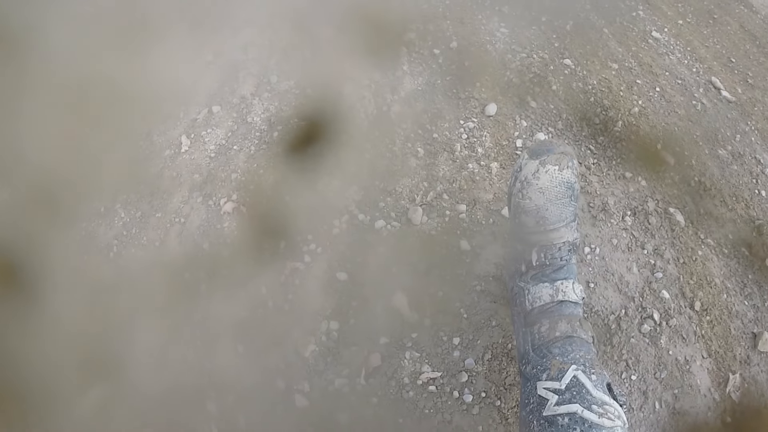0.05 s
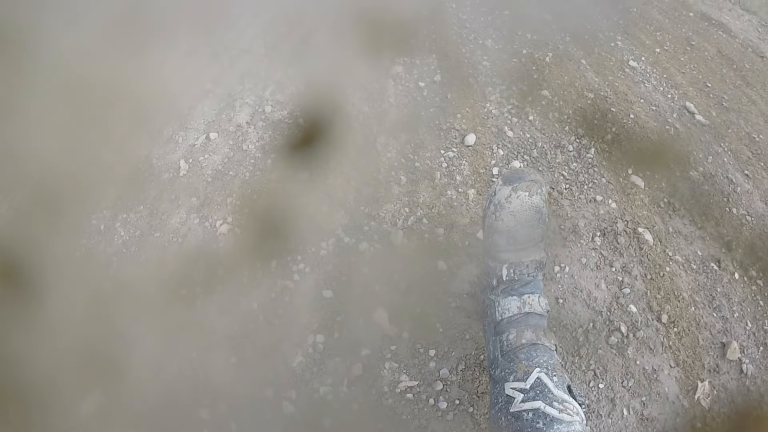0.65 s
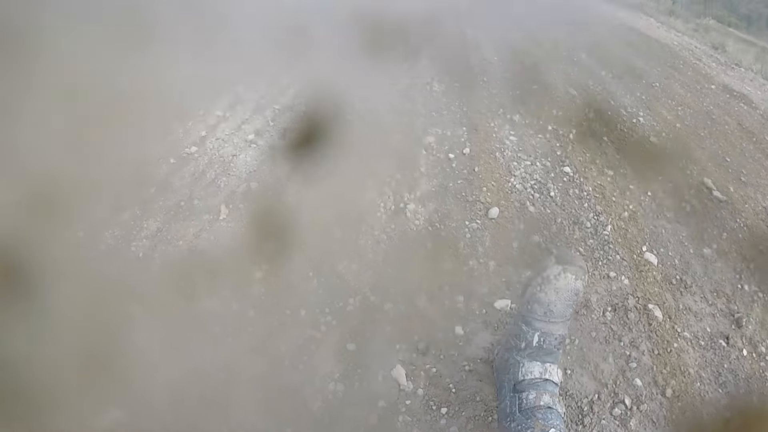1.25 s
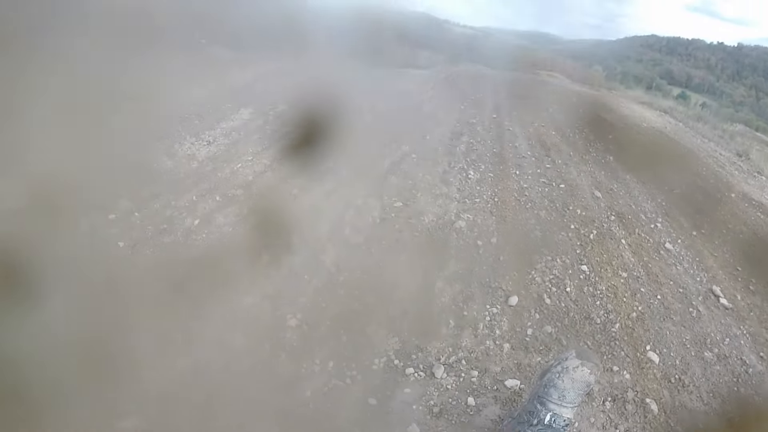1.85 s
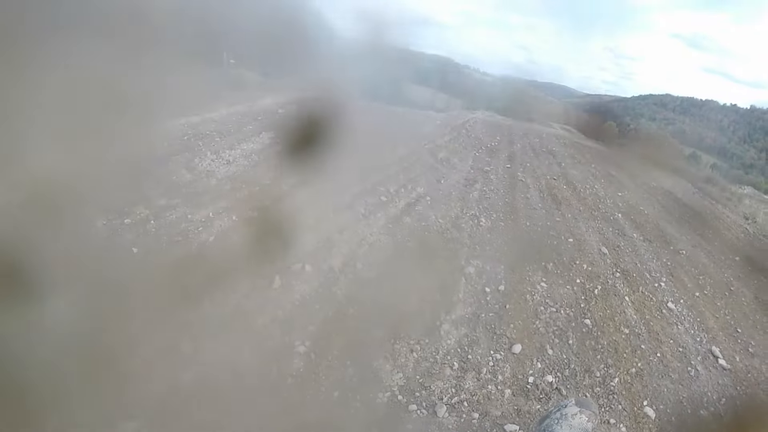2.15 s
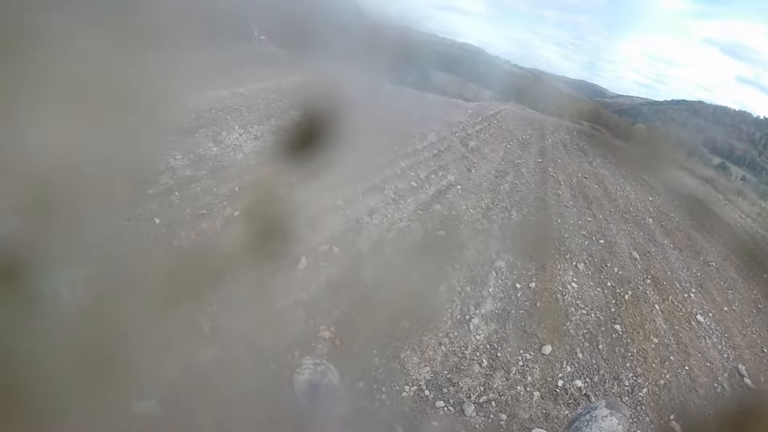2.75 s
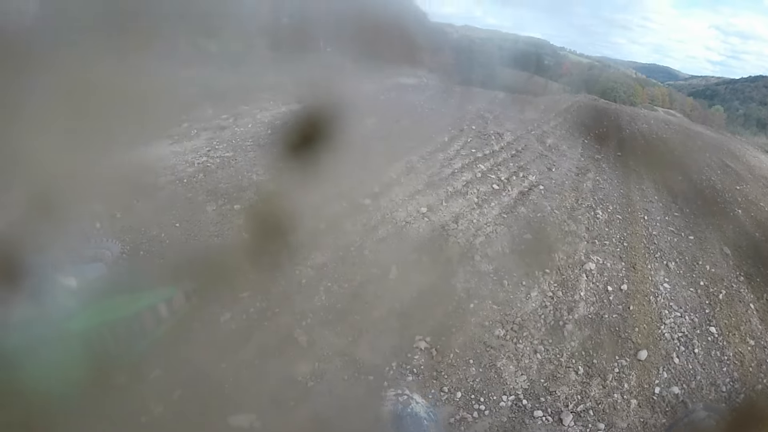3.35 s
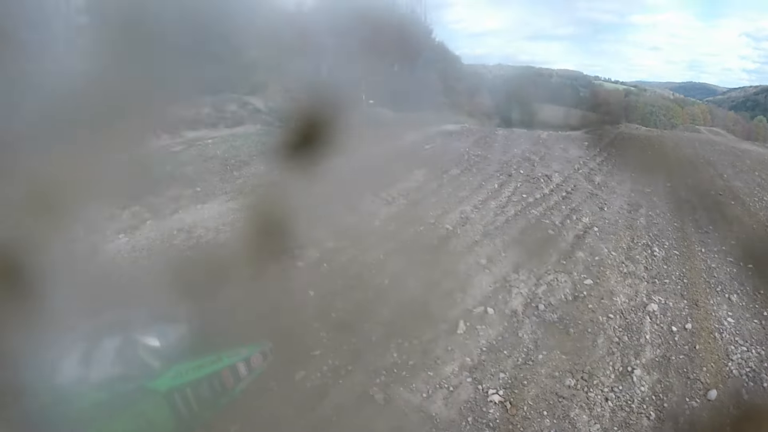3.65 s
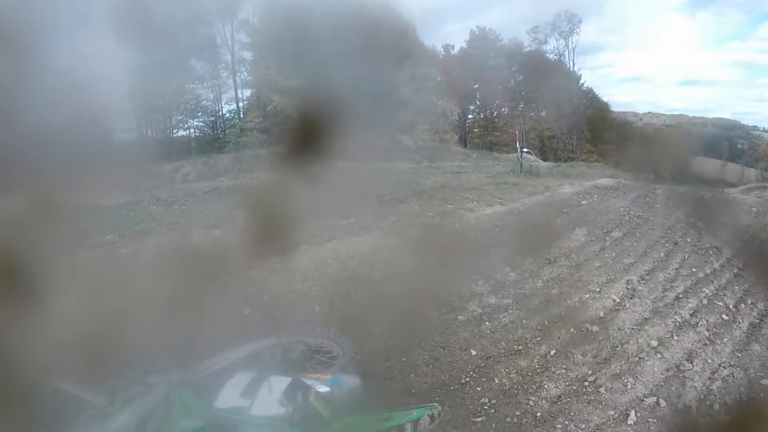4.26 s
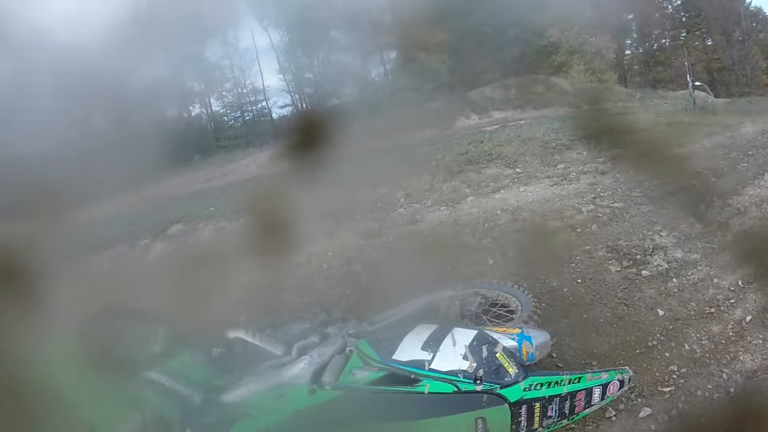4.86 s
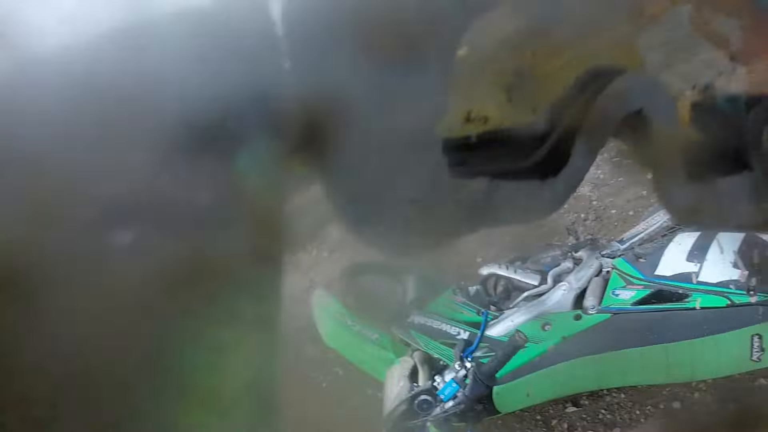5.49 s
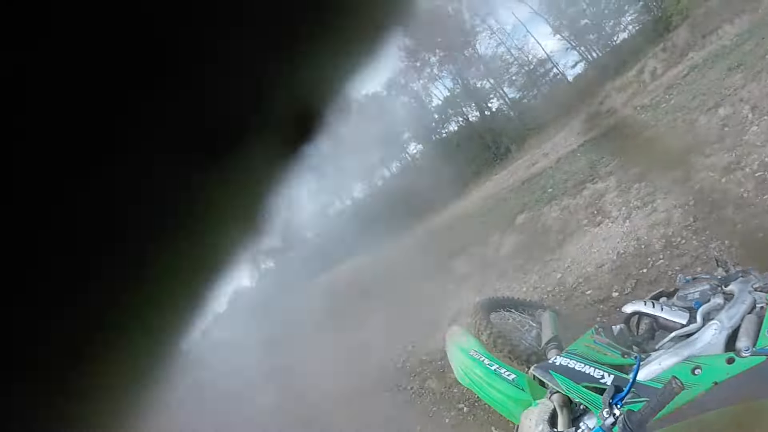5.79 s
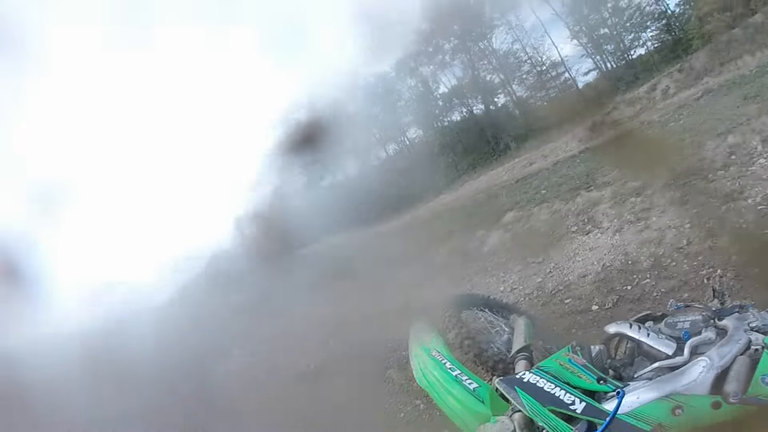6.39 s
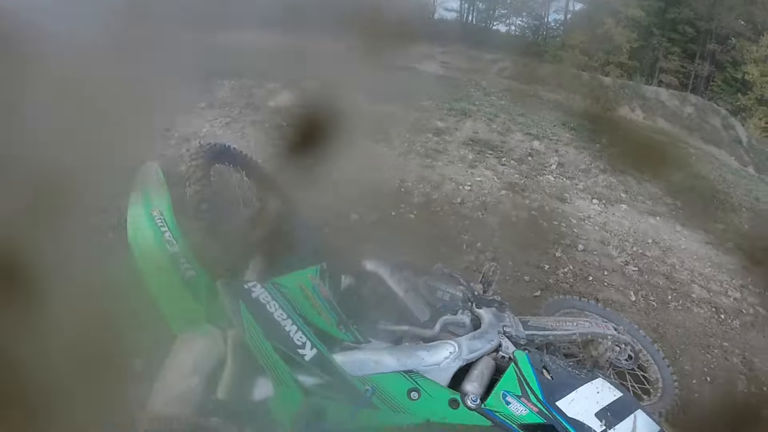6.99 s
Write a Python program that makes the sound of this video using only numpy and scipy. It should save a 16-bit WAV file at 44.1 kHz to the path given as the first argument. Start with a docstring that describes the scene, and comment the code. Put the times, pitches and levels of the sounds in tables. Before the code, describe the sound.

Close gritty scrapes, hollow gear knocks and a glove rubbing the microphone case, over wind and a dirt bike engine fading and returning.

```python
"""Grit scrapes and stones and gear knock as a fallen rider slides along a dirt track and gets up.
Near the end a glove bumps the camera's closed case, rubs across it and lets go with a snap.
We listen from inside that case, on the helmet: it rings with the blows, and wind buffets it.
Behind all this, the exhaust pulses of a four-stroke dirt bike fade, return and fade again,
and a second bike drones far away."""
import sys
import numpy as np
from scipy import signal
from scipy.fft import rfft, irfft, next_fast_len
from scipy.io import wavfile
from scipy.ndimage import map_coordinates

SR = 44100
rng = np.random.default_rng(int(sys.argv[2]) if len(sys.argv) > 2 else 0)


def output_pcm(signal):
    """Save a mono or channel-first signal as 16-bit PCM at the path in sys.argv[1].

    Samples are clipped to [-1, 1] before scaling.
    """
    pcm = np.clip(np.atleast_2d(signal).T, -1, 1) * 32767
    wavfile.write(sys.argv[1], SR, np.round(pcm).astype(np.int16))


N = 310023
TIME = np.arange(N) / SR

# The deep boom of both bikes' exhaust pipes. Each row: frequency in Hz, level in dB.
BOOM_TONE = [(30, -19.5), (55, -7), (100, 1.5), (160, 2), (205, -13), (300, -23.5), (600, -82.5)]
# The rumble of wind and of the shaken helmet. Each row: frequency in Hz, level in dB.
RUMBLE_TONE = [(8, -18), (22, 4), (35, -4), (75, 3), (110, -3.5), (170, -11.5), (300, -25), (700, -48.5),
               (2000, -100)]


def scrape(pebble_gain, pebble_fade_s):
    """Gear drags dully through soil while grit crunches in clumps and pebbles skitter along."""
    # The tone of soil, grit and pebbles. Each row: frequency in Hz, level in dB.
    drag_tone = [(100, -32.5), (210, -7), (330, 1.5), (400, -0.5), (490, 2), (580, -3), (750, -8),
                 (900, -28), (1500, -35), (3000, -72.5)]
    grit_tone = [(500, -29.5), (870, 1.5), (1200, 0.5), (1500, 0), (2000, -4.5), (2450, -11), (2900, -16),
                 (3200, -12.5), (3700, -20.5), (4700, -23), (5800, -29.5), (7000, -33), (7700, -47.5)]
    pebble_tone = [(700, -24.5), (1300, 1), (2400, -4), (2900, 2), (3600, -1), (5200, -11), (6000, -16.5),
                   (7700, -32.5)]
    drag_gain, grit_gain = footwork()
    clumps = wobble(55)
    drag = coloured(grains(1500, spread_db=1) * amp(2 * clumps), drag_tone)
    grit = coloured(grains(4500, spread_db=3) * amp(2 * clumps + 1.2 * wobble(150)), grit_tone)
    hits = np.abs(grains(110, spread_db=-0.5))
    skitter = signal.lfilter([1], [1, -np.exp(-1 / (pebble_fade_s * SR))], hits)  # each hit fades
    pebbles = coloured(skitter * rng.standard_normal(N), pebble_tone)
    crunch = unit(filtered(grit + pebble_gain * pebbles, case))
    return drag * drag_gain + crunch * grit_gain


def footwork():
    """How loud drag and grit are: strokes swell over a shuffle that lasts until the rider stands."""
    # Boots and gear sweep the ground. Each row: start and length in seconds, drag and grit in dB.
    strokes = [(0.451, .06, -40, -54), (0.789, 0.11, -48, -43.5), (.92, 0.089, -46, -45),
               (1.049, 0.042, -44, -45), (1.314, 0.19, -36.5, -46.5), (1.75, 0.1, -39, -46.5),
               (2.381, 0.024, -37, -31), (2.43, 0.032, -31.5, -32), (2.517, 0.04, -37.5, -36.5),
               (2.728, 0.2, -34.5, -32.5), (2.91, 0.12, -28.5, -32.5), (3.055, 0.13, -27, -30),
               (3.266, 0.037, -30.5, -32.5), (3.317, 0.035, -42, -36.5), (3.47, 0.059, -29.5, -33.5),
               (3.667, 0.15, -29.5, -38.5), (3.883, 0.038, -30, -48.5), (3.959, .1, -41.5, -44),
               (4.054, 0.2, -35, -36), (4.28, 0.096, -40, -39.5), (4.456, 0.19, -38.5, -42.5),
               (4.606, 0.075, -34, -37.5), (4.84, .06, -54, -42), (4.987, 0.047, -35, -38.5),
               (5.208, 0.26, -45.5, -46.5), (6.714, 0.035, -31.5, -39), (6.888, 0.057, -37, -50)]
    shuffle_s, drag_t60, grit_t60 = 5.1, 0.38, 0.42  # a t60 is the seconds it takes to fade by 60 dB
    drag_power = (amp(-43) * swell(0, shuffle_s, 0.01, drag_t60)) ** 2
    grit_power = (amp(-52) * swell(0, shuffle_s, 0.01, grit_t60)) ** 2
    for start, length, drag_db, grit_db in strokes:
        rise = 0.3 * length
        drag_power += (amp(drag_db) * swell(start, length, rise, drag_t60)) ** 2
        grit_power += (amp(grit_db) * swell(start, length, rise, grit_t60)) ** 2
    return np.sqrt(drag_power), np.sqrt(grit_power)


def knocks():
    """Boots, knees and gear land heavily. The bass lasts longest, and harder blows are shorter."""
    # Each row: start in seconds, level in dB, extra bass in dB, extra treble in dB.
    blows = [(0.4643, -30, -6, -7.5), (0.945, -36, 12, 2.5), (2.426, -22, 10.5, -8), (2.435, -18.5, 0, -15),
             (2.846, -21.5, -14, -3), (2.8622, -22, 6, -0.5), (2.89, -26.5, 13, -4),
             (2.9023, -21.5, 9.5, -1), (3.0695, -12, 4.5, -4.5), (3.078, -10, 0.5, -16),
             (3.232, -9, -1, -9.5), (3.55, -23, 12, -33), (3.574, -14.5, 2, -13), (4.175, -21, 3.5, -4.5),
             (4.2962, -19.5, 6, -13), (4.6291, -15, 4, -21), (4.9934, -8, 6, -4), (5.0046, -13, 0, -4.5),
             (5.5160, -6, -6, -6), (5.538, -6.5, -11, -6.5), (5.633, -17.5, 5.5, -22),
             (5.6747, -27, 4.5, -21), (6.0334, -31, 4.5, -17), (6.7166, -29, -15, -19)]
    # The bass, middle and treble of a blow. Each row: frequency in Hz, level in dB.
    low_tone = [(60, -29.5), (200, 3), (500, 5), (800, -7), (1200, -38), (3000, -73)]
    middle_tone = [(300, -53), (700, -14), (1000, 1.5), (1800, -4), (2400, -17.5), (5000, -52.5)]
    high_tone = [(900, -49), (1900, -13.5), (2600, 1), (3600, -6), (5500, -15), (7000, -23), (7700, -40.5)]
    low, middle, high = crush(low_tone), crush(middle_tone), crush(high_tone)
    rise = 0.0028
    out = np.zeros(N)
    for start, db, low_db, high_db in blows:
        t60 = 0.081 * 2 ** ((-18.5 - db) / 32)  # 32 dB harder is half as long
        add(out, start, strike(low, start, rise, t60) * amp(db + low_db - 4.5))
        add(out, start, strike(middle, start, rise, t60 * 0.69) * amp(db - 4))
        add(out, start, strike(high, start, rise, t60 * 0.29) * amp(db + high_db - 4))
    return out


def clacks():
    """Stones and hard plastic collide: a short hollow clack under an even shorter snap."""
    # Each row: start in seconds, level in dB, extra treble in dB.
    hits = [(0.813, -21, -14.5), (0.8876, -8.5, -13.5), (1.088, -17, -21.5), (1.343, -22.5, -19.5),
            (1.45, -24, -17), (2.371, -19, -46), (2.386, -13, -27), (2.542, -14, -18.5), (2.975, -23, -8.5),
            (3.009, -21.5, -8.5), (3.078, -1.5, -20), (3.138, -12, -15), (3.169, -12, -24),
            (3.231, -10, -43), (3.281, -15.5, -17), (3.77, -14, -21), (3.803, -17, -21), (3.887, -8.5, -25),
            (4.08, -13.5, -21), (4.124, -13, -19.5), (4.436, -22.5, -19), (4.861, -19.5, -25),
            (5.237, -34, -36), (5.325, -21.5, -25), (5.4593, 1.5, -11), (5.599, -14.5, -37),
            (5.996, -10, -12), (6.951, -32, -36)]
    # The tone of the clack and of the snap. Each row: frequency in Hz, level in dB.
    body_tone = [(150, -26), (450, 6.5), (800, -3.5), (1300, 3.5), (2200, -4), (3000, -6), (3600, -18),
                 (4500, -40.5)]
    snap_tone = [(2200, -35.5), (3400, 0), (4500, -2), (5500, -11), (7500, -18.5)]
    body, snap = crush(body_tone), crush(snap_tone)
    out = np.zeros(N)
    for start, db, treble_db in hits:
        add(out, start, strike(body, start, rise=0.00093, t60=0.04) * amp(db - 11))
        add(out, start, strike(snap, start, rise=0.00047, t60=0.015) * amp(db + treble_db - 2))
    return out


def mount_thumps():
    """The camera mount rings with a hollow note when it is bumped."""
    # Each row: start in seconds, level in dB, pitch in Hz, fade time in seconds.
    bumps = [(2.155, -32, 457, 0.12), (2.239, -19.5, 496, 0.08), (2.370, -2, 500, 0.029),
             (2.378, -12.5, 324, 0.065), (3.069, -13.5, 273, 0.13), (4.302, -19, 343, 0.081),
             (4.634, -17.5, 426, 0.097), (4.995, -3.5, 231, .08), (5.020, -17.5, 484, 0.067),
             (5.03, -13.5, 330, 0.059), (5.549, -5, 190, 0.013), (5.601, -7.5, 327, 0.1),
             (5.639, 6.5, 123, 0.015), (5.999, -16, 450, 0.049), (6.046, -25, 445, 0.055),
             (6.724, -23.5, 442, .1)]
    return rings(bumps, attack=0.0011, waver_rate=260, waver_depth=0.2)


def pings():
    """Sharp hits make the case ring high and briefly, and a buckle ticks."""
    # Each row: start in seconds, level in dB, pitch in Hz, fade time in seconds.
    hits = [(.888, -8, 3340, 0.012), (.888, -14, 1280, 0.03), (.890, -15, 1902, 0.027),
            (3.078, -11, 1282, 0.059), (3.232, -10.5, 1286, 0.04), (.815, -29, 2930, 0.035),
            (3.885, -28, 2880, 0.027), (4.081, -21.5, 2840, 0.03), (4.125, -24.5, 2940, 0.032),
            (4.631, -15, 1260, 0.049), (5.010, -16, 6170, 0.005), (5.034, 3, 6030, 0.0027),
            (5.237, -31, 1274, 0.047), (5.998, -5, 2885, 0.011), (6.719, -33.5, 2715, 0.088),
            (6.953, -25, 1240, 0.022)]
    return rings(hits, attack=0.0015, waver_rate=1300, waver_depth=0.49)


def helmet_jolts():
    """A jolt sets the helmet ringing at one low pitch, with a rumble that dies as fast."""
    # Each row: start in seconds, level in dB, fade time in seconds.
    jolts = [(.638, -19, 0.093), (1.131, -22, .08), (1.239, -26, 0.092), (1.324, -23, .09),
             (1.401, -22.5, 0.12), (1.461, -22.5, 0.21), (1.621, -20.5, 0.091), (2.371, -22, 0.27),
             (3.073, -16, .16), (4.619, -18, 0.21), (4.997, -20.5, .12), (5.69, -22, 0.13)]
    helmet_hz = 77
    notes = [(start, db, helmet_hz, t60) for start, db, t60 in jolts]
    ring = rings(notes, attack=0.0021, waver_rate=160, waver_depth=0.52)
    shake = sum(amp(db) * swell(start, length=0.0069, rise=0.0041, t60=t60) for start, db, t60 in jolts)
    rumble = shake * coloured(rng.standard_normal(N), RUMBLE_TONE)
    return amp(-1) * ring + amp(-3.5) * rumble


def boot_scuffs():
    """A sole bites into packed soil and lets go with a hollow scuff."""
    # Each row: start in seconds, level in dB, rise time and fade time in seconds.
    scuffs = [(1.059, -36, .03, 0.14), (1.36, -33.5, 0.11, 0.18), (1.791, -33.5, 0.046, 0.51),
              (2.84, -18, 0.023, 0.24), (2.888, -20.5, 0.0086, 0.15), (3.499, -29, 0.052, .08),
              (4.621, -29.5, 0.012, 0.12), (6.9, -43, 0.033, 0.21)]
    # The tone of a sole on soil. Each row: frequency in Hz, level in dB.
    sole_tone = [(200, -32.5), (330, 3), (400, -9), (470, 6.5), (600, 2), (750, 7.5), (900, -19.5),
                 (1300, -8), (1700, -20.5), (3500, -52)]
    soil = np.pad(grains(1200, spread_db=7), (0, SR))
    sole = unit(filtered(coloured(soil, sole_tone), case))
    out = np.zeros(N)
    for start, db, rise, t60 in scuffs:
        add(out, start, strike(sole, start, rise, t60) * amp(db))
    return out


def glove():
    """Cloth hisses over the case, growing louder and duller as it presses harder."""
    # Each row: start and length in seconds, first and last level in dB.
    wipes = [(5.465, 0.075, -26.5, -11), (5.562, 0.31, -44, -30), (5.864, 0.067, -39, -24.5)]
    # The tone of rubbing cloth. Each row: frequency in Hz, level in dB.
    cloth_tone = [(120, -43), (200, -0.5), (256, -10), (424, 1.5), (502, -4.5), (1540, -4.5), (1960, -17),
                  (2060, -8.5), (2750, -11), (3620, -19.5), (5240, -23), (7800, -36.5), (10100, -66),
                  (17200, -120)]
    rub = coloured(grains(9000, spread_db=3.5) * amp(0.99 * wobble(140)), cloth_tone)
    dull = filtered(rub, lambda hz: 1 / (1 + (hz / 2500) ** 4))
    out = np.zeros(N)
    for start, length, first_db, last_db in wipes:
        press_db = np.interp(TIME, [start, start + length], [first_db, last_db])
        treble_db = 0.5 - 0.3 * (press_db + 28.5)
        cloth = dull + (rub - dull) * amp(treble_db)
        out += amp(press_db) * swell(start, length, rise=0.004, t60=0.099) * cloth
    return out


def wind():
    """Wind buffets the case in lumps, over a quiet outdoor hush."""
    # The wind's strength. Each row: time in seconds, level in dB.
    gusts = [(0, -30), (.3, -32), (.46, -25.5), (.75, -32.5), (2.1, -33.5), (2.45, -26.5), (2.95, -31.5),
             (3.45, -32), (3.78, -25), (4.2, -34.5), (4.58, -27), (4.95, -32), (5.17, -43.5), (5.62, -31.5),
             (5.9, -44), (6.45, -51), (7.03, -33.5)]
    # The tone of the hush. Each row: frequency in Hz, level in dB.
    air_tone = [(88, -37), (150, -16), (177, -9.5), (195, -18.5), (250, -30.5), (385, -18.5), (425, -24.5),
                (563, -26), (1650, -34.5), (7800, -65.5), (10100, -99), (17200, -120)]
    gust_db, = curves(gusts)
    rumble = coloured(rng.standard_normal(N), RUMBLE_TONE)
    lumps = unit(rumble * amp(0.51 * wobble(22) + 1.9 * wobble(8)))
    hush = coloured(rng.standard_normal(N), air_tone)
    return lumps * amp(gust_db) + hush * amp(-53.5)


def passing_bike():
    """Exhaust pulses make a note, a boom and a rasp. The bike leaves, returns and drops behind a hill."""
    # Engine speed. Each row: time in seconds, firings per second.
    revs = [(0, 52.8), (.2, 54.08), (.4, 51.68), (.55, 54), (.85, 48.6), (1.0, 47.23), (1.3, 45.7),
            (2.1, 42.14), (2.6, 43.04), (3.7, 40.1), (4.1, 41.98), (4.5, 53.08), (4.85, 60.5),
            (5.15, 62.75), (6.15, 54.76), (7.03, 62.2)]
    # Exhaust loudness. Each row: time in seconds, note in dB, boom in dB.
    levels = [(0, -29, -44), (.22, -35.5, -63), (.52, -35.5, -55), (.7, -39, -65.5), (1.55, -39, -45.5),
              (2.4, -50.5, -41), (4.2, -43, -41), (4.6, -33.5, -40.5), (4.9, -34.5, -29.5),
              (5.1, -36.5, -49), (5.3, -59.5, -53), (6.1, -59.5, -50.5), (7.03, -52, -39)]
    # The tone of the pipe and of the open throttle's rasp. Each row: frequency in Hz, level in dB.
    pipe_tone = [(30, -19), (100, -12.5), (160, -8.5), (210, 4), (245, 3.5), (272, 0), (320, -6),
                 (375, -14), (425, -9.5), (480, -18), (540, -12.5), (700, -20.5), (1200, -31),
                 (3000, -64.5)]
    rasp_tone = [(180, -31.5), (300, -0.5), (343, -19), (420, 1.5), (468, -7), (588, -2), (770, -15.5),
                 (858, -9.5), (2770, -26), (5210, -52.5), (7500, -69), (9750, -97), (16500, -120)]
    rate_hz, = curves(revs)
    note_db, boom_db = curves(levels)
    note, cycle = firings(rate_hz, pipe_tone, scatter_db=2.3)
    boom, _ = firings(rate_hz, BOOM_TONE, scatter_db=1)
    surge = amp(-25.5) * swell(start=0.336, length=0.18, rise=0.04, t60=0.089)
    puffs = 1 + 0.56 * np.exp(-3 * (cycle % 1))  # one per firing
    rasp = coloured(rng.standard_normal(N) * puffs, rasp_tone)
    rasp_db = -31.5 - 34 * np.maximum(TIME - 0.035, 0)  # holds, then loses 34 dB a second
    return note * amp(note_db) + boom * (amp(boom_db) + surge) + rasp * amp(rasp_db)


def far_bike():
    """A distant engine drones at a steady speed and grows louder near the end as it approaches."""
    drone, _ = firings(rate_hz=44.6, pipe=BOOM_TONE, scatter_db=5)
    return drone * amp(-67 + 20 * np.maximum(TIME - 5.67, 0))


def firings(rate_hz, pipe, scatter_db):
    """Uneven exhaust pulses through a pipe, smeared on the way here; also the running firing count."""
    cycle = np.cumsum(rate_hz * (1 + 0.0033 * wobble(15))) / SR
    pulses = np.diff(np.floor(cycle), prepend=0) * amp(scatter_db * rng.standard_normal(N))
    pulses -= pulses.mean()
    lag_s_per_hz = 0.02 / 300  # high tones arrive after low ones
    exhaust = filtered(pulses, lambda hz: along(pipe, hz) * np.exp(-1j * np.pi * lag_s_per_hz * hz ** 2))
    return unit(exhaust), cycle


def case(hz):
    """The case lets sound through and rings at its own pitches."""
    # Each row: pitch in Hz, width in Hz, level in dB.
    resonances = [(1026, 92, 1), (1263, 58, 9), (1851, 28, 4), (2300, 48, 3.5), (2692, 69, 10.5),
                  (2866, 140, 7.5), (2910, 46, 2), (3340, 29, -5), (4055, 110, -3), (5117, 140, 4)]
    return 1 + sum(amp(db) * 1j * hz * width / (pitch ** 2 - hz ** 2 + 1j * hz * width)
                   for pitch, width, db in resonances)


def crush(tone):
    """Noise of many tiny contacts at once, heard through the case."""
    return unit(filtered(coloured(rng.standard_normal(N + SR), tone), case))


def strike(noise, start, rise, t60):
    """A piece of noise that swells and dies as one blow."""
    t = np.arange(SR // 4) / SR
    shape = np.minimum(t / rise, 1) * amp(-60 * np.maximum(t - rise, 0) / t60)
    piece = noise[int(start * SR):][:len(t)]
    return unit(piece * shape) * np.sqrt(np.mean(shape ** 2))


def rings(rows, attack, waver_rate, waver_depth):
    """Each contact rings one note that wavers as it dies."""
    t = np.arange(SR // 4) / SR
    onset = 1 - np.exp(-(t / attack) ** 2)
    waver = np.pad(waver_depth * wobble(waver_rate), (0, SR))
    out = np.zeros(N)
    for start, db, hz, t60 in rows:
        phase = 2 * np.pi * hz * t + waver[int(start * SR):][:len(t)]
        add(out, start, np.sqrt(2) * amp(db - 60 * t / t60) * onset * np.sin(phase))
    return out


def grains(rate, spread_db):
    """Tiny random impacts, about rate a second; spread_db makes their sizes uneven."""
    sizes = amp(spread_db * np.minimum(rng.standard_exponential(N), 4))
    return unit((rng.random(N) < rate / SR) * sizes * rng.choice([-1, 1], N))


def swell(start, length, rise, t60):
    """A gain that rises, holds until the length is over and dies away."""
    out = np.zeros(N)
    t = np.arange(int((length + 1.5 * t60) * SR)) / SR
    add(out, start, np.minimum(t / rise, 1) * amp(-60 * np.maximum(t - length, 0) / t60))
    return out


def amp(db):
    """Turn decibels into a gain."""
    return 10 ** (np.asarray(db) / 20)


def unit(x):
    """Scale a sound to an average power of 1."""
    return x / np.sqrt(np.mean(x ** 2) + 1e-20)


def along(tone, hz):
    """The gain of a tone table at any frequency."""
    points_hz, db = np.transpose(tone)
    return amp(np.interp(np.log(hz + 1), np.log(points_hz), db))


def curves(rows):
    """One value per sample for each column after the time."""
    times, *columns = np.transpose(rows)
    return [np.interp(TIME, np.sort(times), column) for column in columns]


def wobble(rate):
    """A smooth curve through rate random points a second."""
    return map_coordinates(rng.standard_normal(int(N * rate / SR) + 4), [TIME * rate])


def filtered(x, response):
    """Multiply each frequency in a sound by response(hz)."""
    size = next_fast_len(len(x) + 8192)
    return irfft(rfft(x, size) * response(np.fft.rfftfreq(size, 1 / SR)), size)[:len(x)]


def coloured(x, tone):
    """Shape a sound with a tone table, at an average power of 1."""
    return unit(filtered(x, lambda hz: along(tone, hz)))


def add(track, start, sound):
    """Mix a sound into a track at start seconds."""
    part = track[max(round(start * SR), 0):][:len(sound)]
    part += sound[:len(part)]


def scene():
    """Mix all the sources into one channel."""
    dirt = scrape(pebble_gain=0.28, pebble_fade_s=0.006) + boot_scuffs()
    ringing = mount_thumps() + pings()
    background = passing_bike() + far_bike() + wind()
    blows = helmet_jolts() + knocks() + clacks()
    return (dirt + blows + ringing + glove() + background)[None]


def record(dry):
    """Round off the loudest peaks and cut the highest treble."""
    top_hz = 7600
    rounded = dry[0] / (1 + np.abs(dry[0]) ** 6) ** (1 / 6)
    return filtered(rounded, lambda hz: 1 / (1 + (hz / top_hz) ** 80))[None]


dry = scene()
out = record(dry)
output_pcm(out)
```